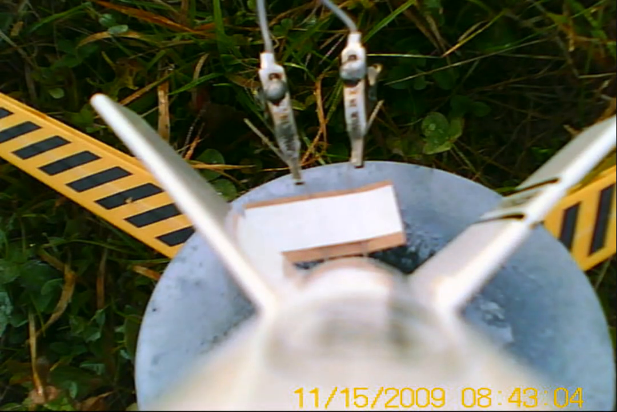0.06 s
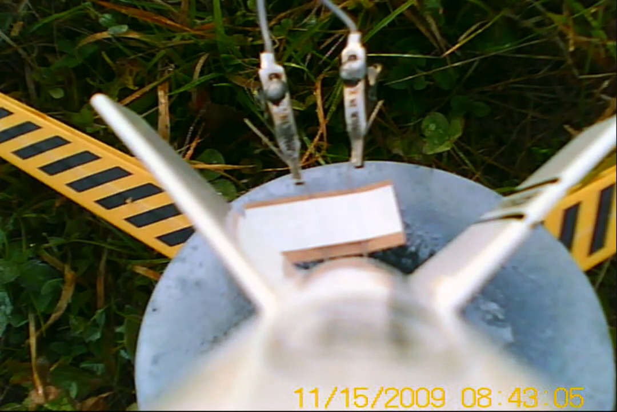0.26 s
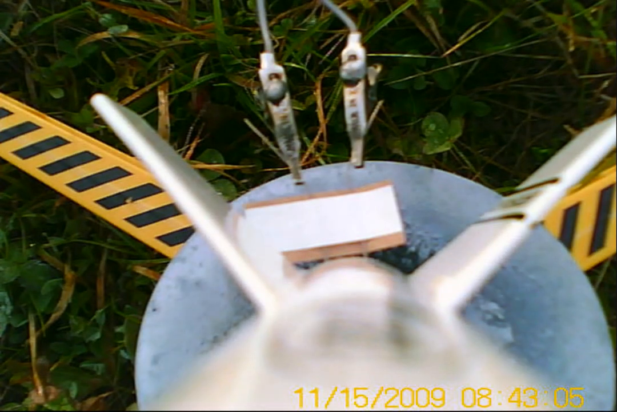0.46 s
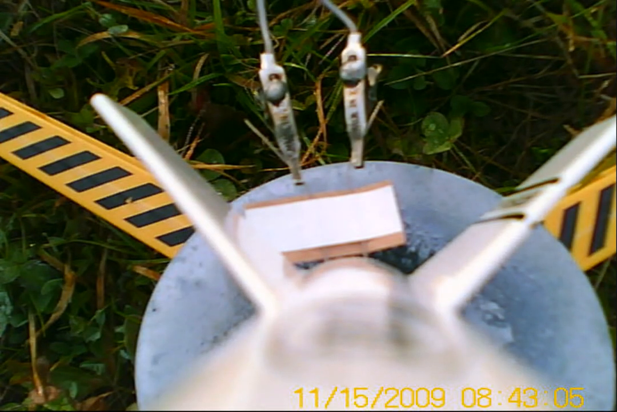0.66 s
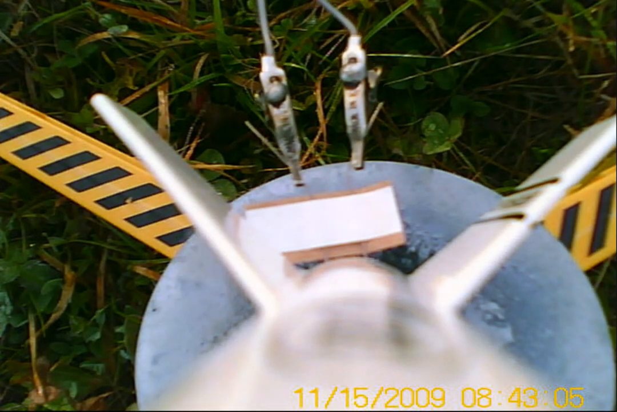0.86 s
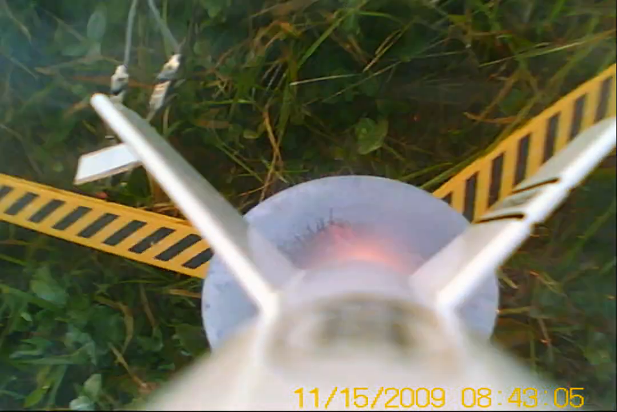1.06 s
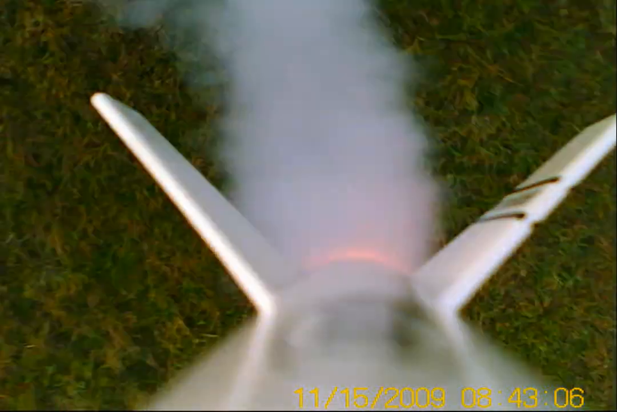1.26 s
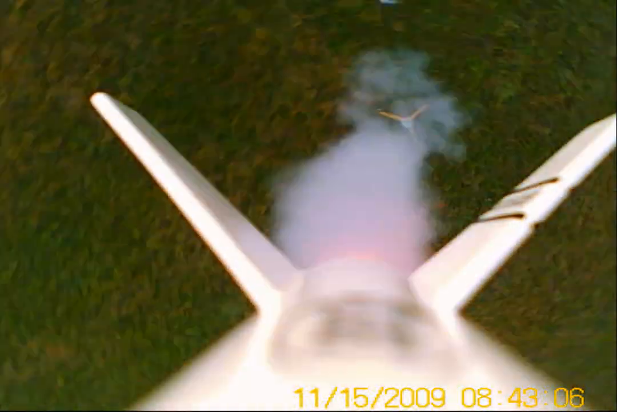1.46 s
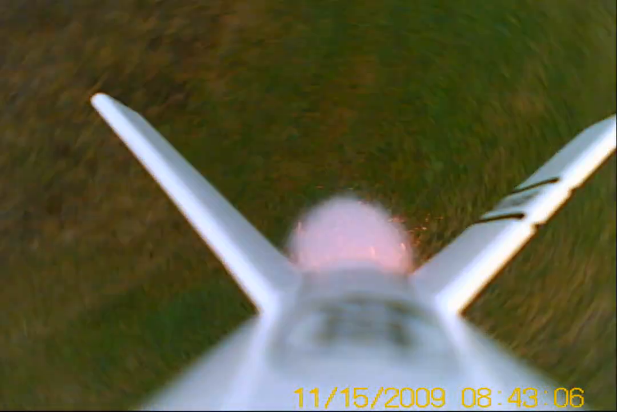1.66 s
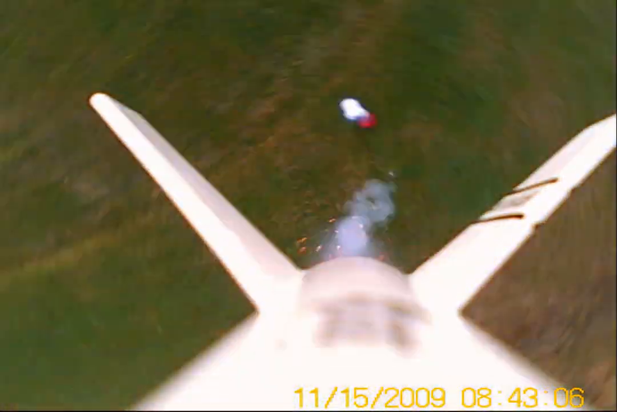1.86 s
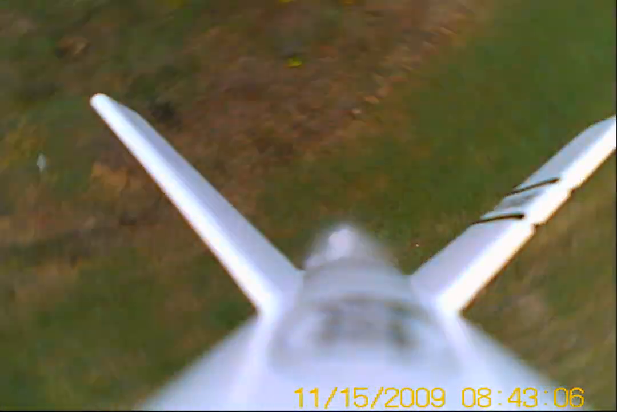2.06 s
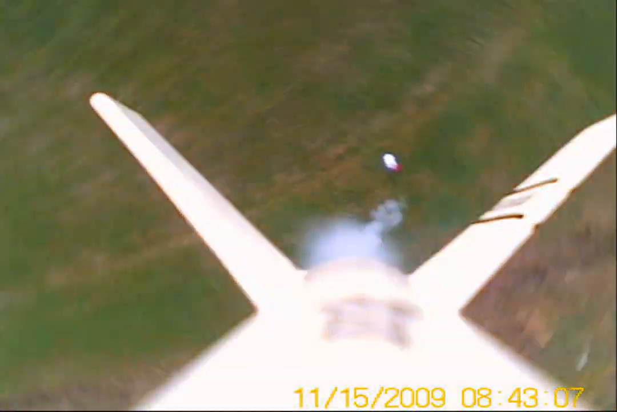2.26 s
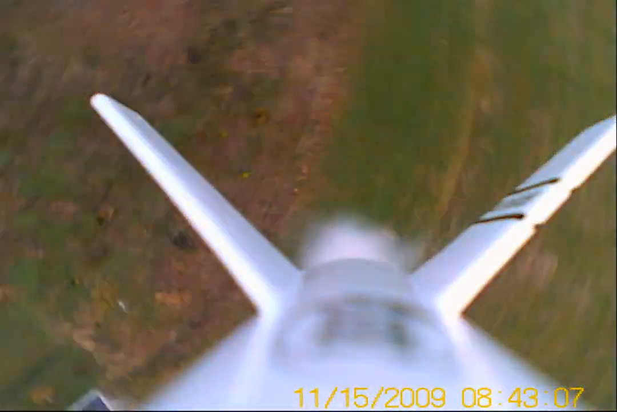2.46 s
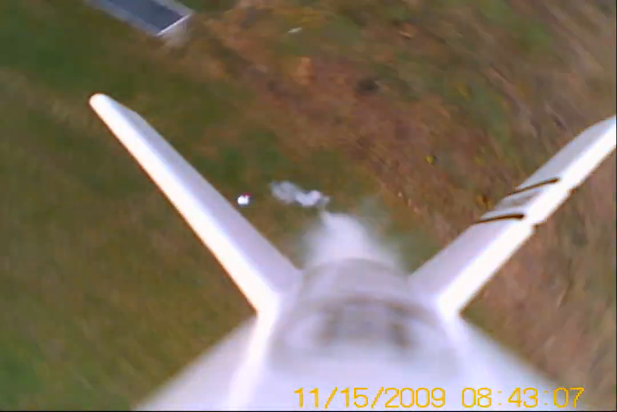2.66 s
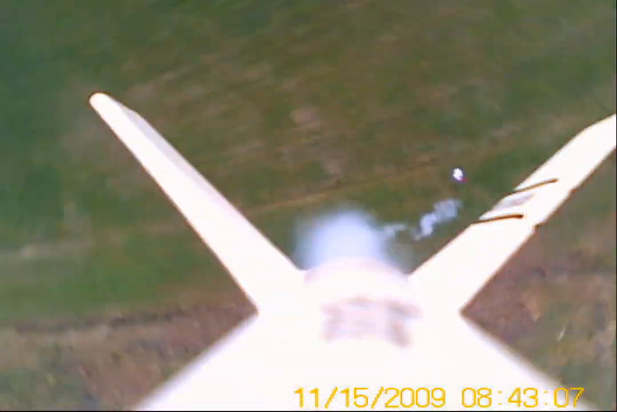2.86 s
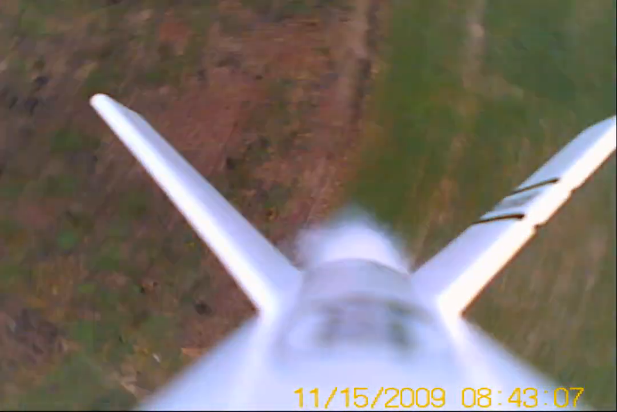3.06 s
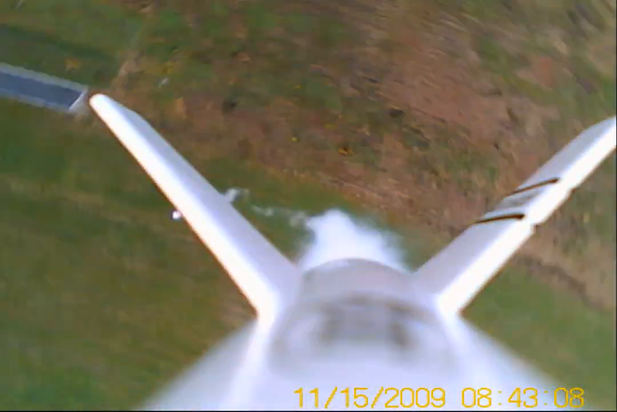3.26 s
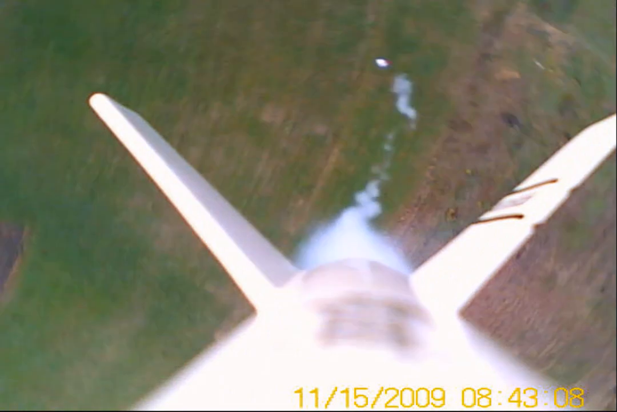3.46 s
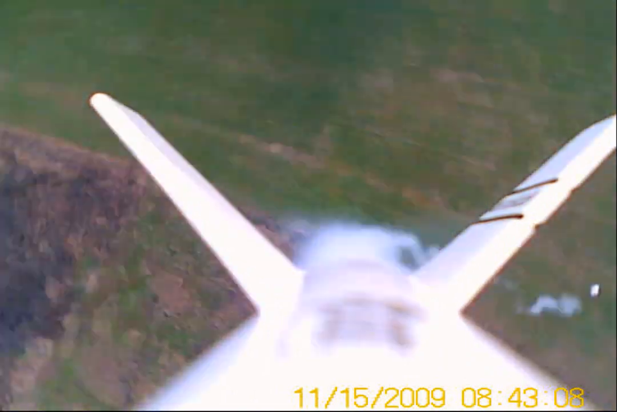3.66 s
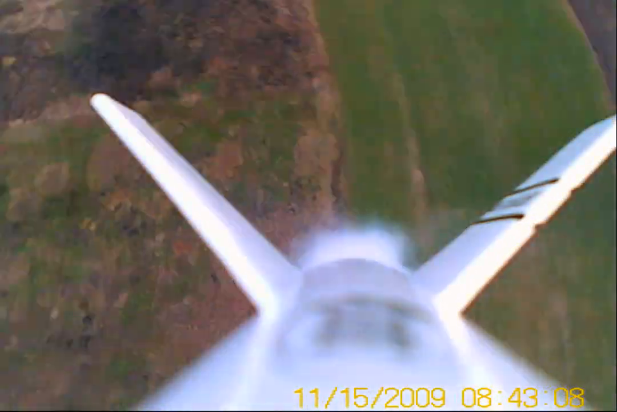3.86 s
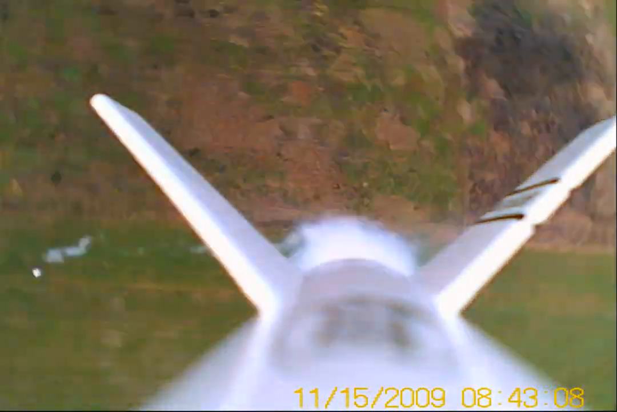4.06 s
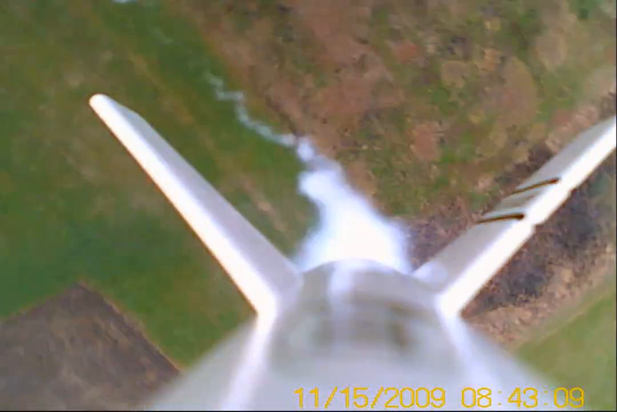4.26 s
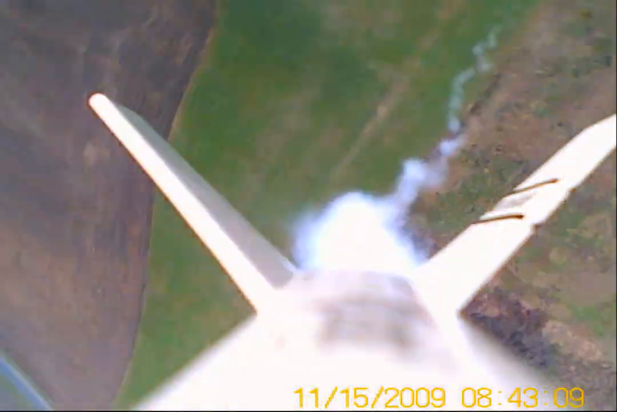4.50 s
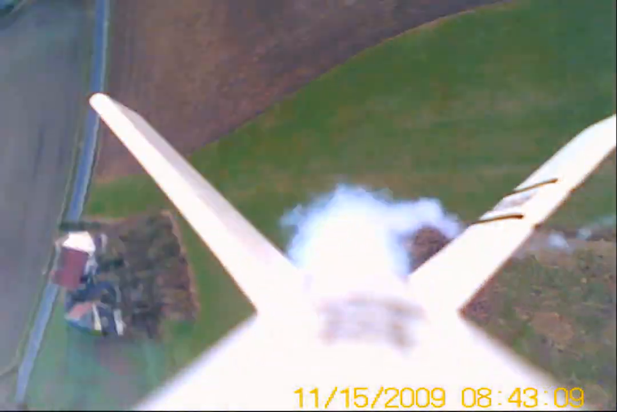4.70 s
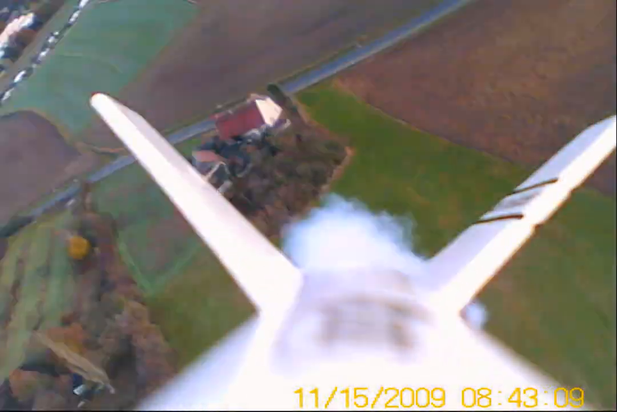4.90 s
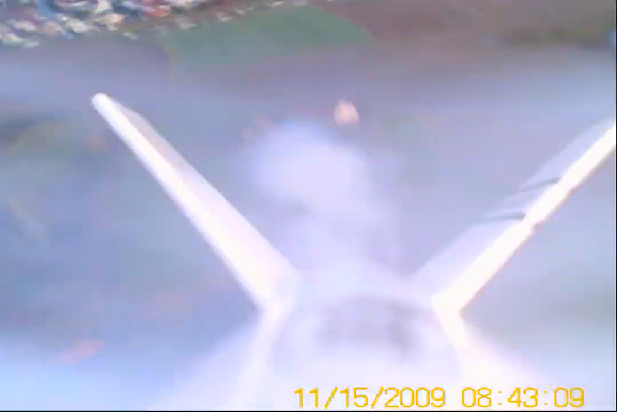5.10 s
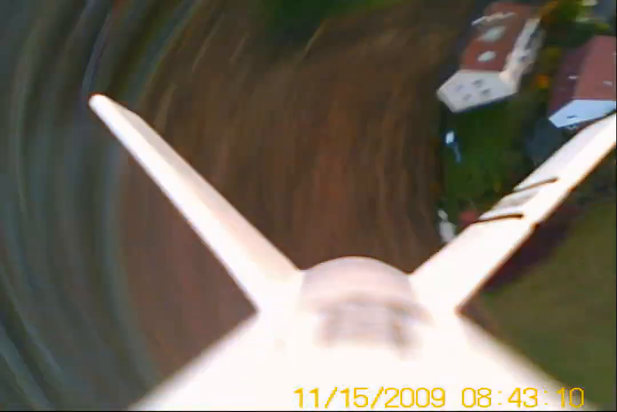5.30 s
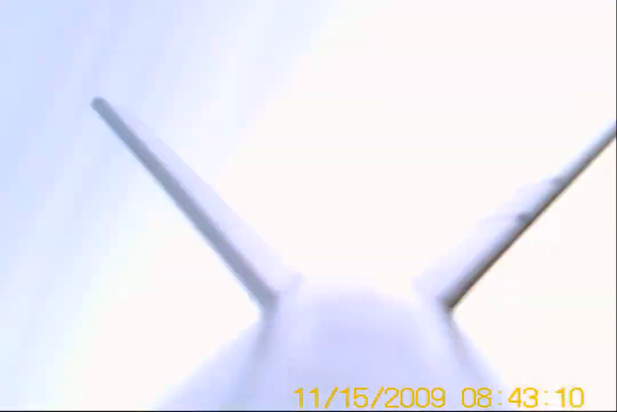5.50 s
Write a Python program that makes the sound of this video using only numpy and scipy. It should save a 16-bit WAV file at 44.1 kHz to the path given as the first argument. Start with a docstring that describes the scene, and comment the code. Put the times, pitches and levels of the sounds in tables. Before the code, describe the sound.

A small onboard microphone hears a model rocket launch outdoors. A brief crackling fizz leads into a sudden bright blast that surges unevenly, then gives way to a long rush of air that slowly fades. Near the end the ejection charge pops with a short hollow knock from the tube, the parachute flaps open and wind slaps the microphone, overloading it on the peaks.

```python
"""A model rocket motor blasts against the pad's deflector plate and lifts off, heard from the rocket's body.
Before it, the igniter fizzes over the low rumble of a field. In flight, eddies and hiss follow the
airspeed, growing dull and quiet as the rocket coasts. The ejection charge pops, the tube rings, the
parachute flaps out and the body tumbles in the wind. Peaks overload the small onboard camera's input."""
import sys
import numpy as np
from scipy import signal
from scipy.fft import rfft, irfft, next_fast_len
from scipy.io import wavfile
from scipy.ndimage import uniform_filter1d

SR = 44100
rng = np.random.default_rng(int(sys.argv[2]) if len(sys.argv) > 2 else 0)


def inscribe(sig):
    """Save sig as 16-bit PCM at rate SR to the path in sys.argv[1].

    A 1-D sig is mono; a 2-D sig holds one channel per row.
    Samples are clipped to [-1, 1] before scaling.
    """
    pcm = np.round(np.clip(np.atleast_2d(sig).T, -1, 1) * 32767)
    wavfile.write(sys.argv[1], SR, pcm.astype(np.int16))


N = 244314
TIME = np.arange(N) / SR
IGNITION_S, LIFTOFF_S, TOP_SPEED_S, BURNOUT_S, TUMBLE_S = 0.95, 1.16, 1.656, 2.06, 5.11
TOP_SPEED_M_S = 58.7


def gain_of(db):
    """Decibels to amplitude."""
    return 10 ** (np.asarray(db) / 20)


def unit_rms(x):
    """Scales to rms 1."""
    return x / np.sqrt(np.mean(x ** 2) + 1e-20)


def power_sum(gains):
    """Joint gain of unrelated noises: powers add."""
    return np.sqrt(sum(gain ** 2 for gain in gains))


def held(start_s, end_s, attack_s, release_s):
    """Gain that rises exponentially to 1 at start_s, holds until end_s, then decays."""
    return np.exp(-np.maximum(start_s - TIME, 0) / attack_s - np.maximum(TIME - end_s, 0) / release_s)


def swell(at_s, half_s, t=TIME):
    """Bell-shaped gain around at_s."""
    return np.exp(-0.5 * ((t - at_s) / half_s) ** 2)


def spectrum_db(points, hz):
    """Spectrum interpolated in log frequency; -12 dB/octave beyond its ends."""
    f, db = np.transpose(points)
    octaves_beyond = np.maximum(np.log2(f[0] / (hz + 1)), 0) + np.maximum(np.log2((hz + 1) / f[-1]), 0)
    return np.interp(np.log(hz + 1), np.log(f), db) - 12 * octaves_beyond


def bass_shelf(hz, corner_hz):
    """Weight: 1 in the bass, 0 in the treble."""
    return 1 / (1 + (hz / corner_hz) ** 2)


def coloured(x, points):
    """Filters x by a static spectrum; rms 1."""
    size = next_fast_len(N)
    response = gain_of(spectrum_db(points, np.fft.rfftfreq(size, 1 / SR)))
    return unit_rms(irfft(rfft(x, size) * response, size)[:N])


def lowpassed(x, hz):
    """Two-pole low-pass; rms 1."""
    return unit_rms(signal.sosfilt(signal.butter(2, hz, fs=SR, output="sos"), x))


def flutter(rate_hz, depth_db):
    """Random gain of unit power, wavering up to rate_hz."""
    return unit_rms(gain_of(depth_db * lowpassed(rng.standard_normal(N), rate_hz)))


def moving_noise(shape_db, patchy_db, size):
    """Steady-power noise whose spectrum follows shape_db(t, hz), with drifting patches."""
    hop = size // 4
    t, hz = np.arange(N // hop + 5)[:, None] * hop / SR, np.fft.rfftfreq(size, 1 / SR)
    real, imag, patches = rng.standard_normal((3, len(t), len(hz)))
    patches = unit_rms(uniform_filter1d(uniform_filter1d(patches, size=6, axis=0), size=7, axis=1))
    shape = gain_of(shape_db(t, hz))
    shape /= np.linalg.norm(shape, axis=-1, keepdims=True)
    frames = (real + 1j * imag) * gain_of(patchy_db * patches) * shape
    return unit_rms(signal.istft(frames.T, nperseg=size, noverlap=size - hop)[1][:N])


def burst(centre_hz, octaves, hold_s, decay_s):
    """Noise, briefly held then decaying, through one broad resonance."""
    t = np.arange(4096) / SR
    edges_hz = np.clip(centre_hz * 2 ** (np.array([-1, 1]) * octaves / 2), 20, SR / 2 - 1)
    band = signal.butter(2, edges_hz, "bandpass", fs=SR, output="sos")
    noise = rng.standard_normal(len(t)) * np.exp(-np.maximum(t - hold_s, 0) / decay_s)
    return unit_rms(signal.sosfilt(band, noise)) * noise.std()


def add(mix, at_s, sound):
    """Mixes a sound in at at_s."""
    part = mix[round(at_s * SR):][:len(sound)]
    part += sound[:len(part)]


# field rumble: f/Hz, relative level/dB
FIELD_SPECTRUM = [(20, 1), (40, -4), (75, -6.5), (110, -12), (170, -16.5), (280, -24), (450, -30.5),
                  (800, -32.5), (1100, -30), (1800, -36), (3200, -40.5), (6000, -44), (10000, -47)]
# hum and whines: f/Hz, rms level/dB
HUM_PARTIALS = [(32, -40), (56.4, -37.5), (360.7, -73.5), (2697, -77), (5599, -79)]
# wavering tone: t/s, f/Hz, rms level/dB
TONE_TRACK = [(0.1, 1020, -76), (0.21, 1010, -65), (0.31, 1058, -59), (0.42, 1030, -64), (0.53, 1006, -62),
              (0.62, 988, -76)]


def field():
    """Steady rumble and hum; a faint tone wavers before launch."""
    hum = sum(gain_of(db) * np.sin(2 * np.pi * (hz * TIME + rng.random())) for hz, db in HUM_PARTIALS)
    track_s, track_hz, track_db = np.transpose(TONE_TRACK)
    pitch_hz = np.interp(TIME, track_s, track_hz) * flutter(rate_hz=40, depth_db=0.07)
    gate = held(track_s[0], track_s[-1], attack_s=0.008, release_s=0.008)
    tone = gate * gain_of(np.interp(TIME, track_s, track_db)) * np.sin(2 * np.pi * np.cumsum(pitch_hz) / SR)
    rumble = gain_of(-40) * coloured(rng.standard_normal(N), FIELD_SPECTRUM)
    return rumble + np.sqrt(2) * (hum + tone)


# nozzle fizz: f/Hz, relative level/dB
FIZZ_SPECTRUM = [(300, -25), (800, -11.5), (2400, -15), (3000, -18), (4000, -7), (4700, 2), (5300, 0),
                 (6000, -6.5), (6600, -30), (6900, -23), (7400, -8), (8400, -5.5), (9500, -12),
                 (11000, -20)]
# flare-up steps: t/s, level/dB
IGNITER_FLARES = [(0.82, -37.5), (0.903, -30)]
# large sparks: t/s, level/dB, centre f/Hz
LARGE_SPARKS = [(0.825, -40, 6000), (0.857, -27.5, 3500), (0.902, -25, 4900)]


def igniter():
    """Propellant catches: gas and tiny sparks ring the narrow nozzle; a few large sparks snap."""
    sparks_per_s, spark_db = 250, 16
    sparks = (rng.random(N) < sparks_per_s / SR) * rng.standard_normal(N) * gain_of(spark_db)
    gas = rng.standard_normal(N) * flutter(rate_hz=410, depth_db=1.0)
    burning = power_sum(gain_of(db) * held(at_s, IGNITION_S, attack_s=0.0052, release_s=0.008)
                        for at_s, db in IGNITER_FLARES)
    out = burning * coloured(gas + sparks, FIZZ_SPECTRUM)
    for at_s, db, hz in LARGE_SPARKS:
        add(out, at_s, gain_of(db) * burst(hz, octaves=2.7, hold_s=0.00026, decay_s=0.00067))
    return out


# cord and fittings: t/s, level/dB, centre f/Hz
FITTING_TICKS = [(5.108, -22, 2000), (5.231, -27, 5000), (5.254, -24, 2000), (5.299, -33, 4360),
                 (5.491, -46, 7500)]
# cloth: t/s, level/dB, decay/s
CLOTH_FLAPS = [(5.11, -28, .002), (5.2165, -21.5, 0.0062), (5.405, -24, 0.0028), (5.446, -30, .018)]


def parachute():
    """Fittings tick against the body; the cloth shifts and flaps open."""
    out = np.zeros(N)
    for at_s, db, hz in FITTING_TICKS:
        add(out, at_s, gain_of(db) * burst(hz, octaves=1.8, hold_s=0.0008, decay_s=0.0012))
    for at_s, db, decay_s in CLOTH_FLAPS:
        add(out, at_s, gain_of(db) * burst(centre_hz=565, octaves=1.4, hold_s=0.0041, decay_s=decay_s))
    return out


# crosswind: f/Hz, relative level/dB
WIND_SPECTRUM = [(20, 1), (45, 0), (100, -3.5), (200, -12.5), (400, -15.5), (900, -24.5), (1800, -32.5),
                 (3500, -50), (6000, -66), (10000, -85)]
# wind between lulls: start/s, end/s, level/dB
WIND_SPANS = [(5.11, 5.202, -22), (5.214, 5.422, -21), (5.446, 5.542, -22.5)]
# gusts on the microphone: t/s, half width/s, rumble/dB, slap/dB
MIC_GUSTS = [(5.1602, 0.005, -22.5, -5), (5.228, 0.014, -12.5, -6), (5.249, 0.013, -15.5, -9),
             (5.316, 0.02, -22, -9), (5.4088, 0.018, -14, -4)]


def tumble():
    """Wind on the tumbling body; each gust is a swell of rumble with a pressure slap at its peak."""
    slap_s = 0.0016
    wind = coloured(rng.standard_normal(N) * flutter(rate_hz=100, depth_db=2), WIND_SPECTRUM)
    rumble = lowpassed(coloured(rng.standard_normal(N), WIND_SPECTRUM), hz=160)
    out = wind * power_sum(gain_of(db) * held(start_s, end_s, attack_s=0.0046, release_s=0.0074)
                           for start_s, end_s, db in WIND_SPANS)
    for at_s, half_s, rumble_db, slap_db in MIC_GUSTS:
        out += gain_of(rumble_db) * swell(at_s, half_s) * rumble
        out -= gain_of(slap_db) / (1 + ((TIME - at_s) / slap_s) ** 2) ** 1.5
    return out


# tube modes: f/Hz, relative level/dB, t60/s
TUBE_MODES = [(844, -8.5, 0.026), (1990, 1, 0.013), (2320, -12, 0.011), (3330, -6, 0.011)]
# blows on the tube: t/s, level/dB
TUBE_BLOWS = [(5.1407, -3), (5.1445, -12)]


def tube():
    """The light body tube rings briefly under each blow as the nose cone leaves."""
    attack_s = 0.00018
    out, t = np.zeros(N), np.arange(2048) / SR
    ring = sum(gain_of(db - 60 * t / t60_s) * np.sin(2 * np.pi * hz * t) for hz, db, t60_s in TUBE_MODES)
    for at_s, db in TUBE_BLOWS:
        add(out, at_s, gain_of(db) * ring * (1 - np.exp(-t / attack_s)))
    return out


# ejection hiss: f/Hz, relative level/dB
EJECTION_HISS_SPECTRUM = [(300, 9.5), (1200, -11), (3500, -4), (5500, -12), (8500, -8.5), (10500, -18)]
# hiss spells (gas vents before the pop; later the parachute rustles): start/s, end/s, level/dB
HISS_SPELLS = [(5.107, 5.137, -23.5), (5.16, 5.2, -47), (5.227, 5.26, -39.5)]


def ejection():
    """Gas hisses, the charge pops (low thump, hollow bang, bright crack), then the parachute rustles."""
    pop_s = 5.1275
    hissing = power_sum(gain_of(db) * held(start_s, end_s, attack_s=0.0089, release_s=0.017)
                        for start_s, end_s, db in HISS_SPELLS)
    noise = rng.standard_normal(N) * flutter(rate_hz=640, depth_db=3.5)
    out = hissing * coloured(noise, EJECTION_HISS_SPECTRUM)
    thump = gain_of(-7) * burst(centre_hz=300, octaves=1.6, hold_s=0.002, decay_s=0.0009)
    bang = gain_of(1) * burst(centre_hz=1400, octaves=1.3, hold_s=0.0012, decay_s=0.00057)
    crack = gain_of(-5) * burst(centre_hz=6300, octaves=1.34, hold_s=0.0014, decay_s=0.00041)
    add(out, pop_s, thump + bang + crack)
    return out


def airspeed_m_s(t):
    """Linear rise under thrust, then exponential decay under drag."""
    pad_m_s, coast_s = 4, 2.664
    climb = np.clip((t - LIFTOFF_S) / (TOP_SPEED_S - LIFTOFF_S), 0, 1)
    slowing = np.exp(-np.maximum(t - TOP_SPEED_S, 0) / coast_s)
    return (pad_m_s + (TOP_SPEED_M_S - pad_m_s) * climb) * slowing


def airspeed_gain(db_per_decade):
    """Air noise grows as a power of airspeed; gated from lift-off to tumble."""
    flying = held(LIFTOFF_S, TUMBLE_S, attack_s=0.02, release_s=0.03)
    return flying * gain_of(db_per_decade * np.log10(airspeed_m_s(TIME) / TOP_SPEED_M_S))


# hiss at high and low airspeed: f/Hz, relative level/dB
FAST_HISS_SPECTRUM = [(300, -7), (1500, 6.5), (2800, 1.5), (3900, 1), (5000, -0.5), (6200, -2.5),
                      (8000, -3), (9200, -4.5), (10500, -21)]
SLOW_HISS_SPECTRUM = [(300, 8), (1500, -0.5), (2200, -2), (2750, -4.5), (3150, 0.5), (3400, -3),
                      (3850, 0.5), (4600, -5), (5300, -10), (6500, -10.5), (8000, -9.5), (9200, -13),
                      (10500, -27)]


def body_hiss():
    """Air hisses along the tube; the camera housing's resonances stand out as the rocket slows."""
    def shape_db(t, hz):
        slow_m_s, span_m_s = 36, 24
        fast = np.clip((airspeed_m_s(t) - slow_m_s) / span_m_s, 0, 1)
        return fast * spectrum_db(FAST_HISS_SPECTRUM, hz) + (1 - fast) * spectrum_db(SLOW_HISS_SPECTRUM, hz)
    hiss = moving_noise(shape_db, patchy_db=0.33, size=512) * flutter(rate_hz=310, depth_db=0.76)
    return gain_of(-23.5) * airspeed_gain(db_per_decade=32.5) * hiss


# turbulence at the reference airspeed: f/Hz, relative level/dB
EDDY_SPECTRUM = [(20, 2), (60, 2.5), (170, 0.5), (300, -4), (600, -8), (1000, -13.5), (1400, -13),
                 (2000, -23.5), (3000, -29), (8000, -35)]
# rough air: t/s, half width/s, boost/dB, bass tilt/dB
ROUGH_PATCHES = [(1.375, 0.038, 6.5, 9.5), (1.81, 0.051, 2.5, 1.5)]


def turbulence():
    """Eddies pass the microphone, their spectrum sliding with airspeed; rough air swells them."""
    reference_m_s, build_s = 44.5, 0.17

    def shape_db(t, hz):
        eddy_db = spectrum_db(EDDY_SPECTRUM, hz * reference_m_s / airspeed_m_s(t))
        mic_port_loss_db = 4 * bass_shelf(hz, corner_hz=90)
        tilt_db = sum(db * swell(at_s, half_s, t) for at_s, half_s, _, db in ROUGH_PATCHES)
        return eddy_db - mic_port_loss_db + tilt_db * bass_shelf(hz, corner_hz=150)
    eddies = moving_noise(shape_db, patchy_db=0.35, size=2048) * flutter(rate_hz=94, depth_db=1.24)
    rough_db = sum(db * swell(at_s, half_s) for at_s, half_s, db, _ in ROUGH_PATCHES)
    building = np.clip((TIME - LIFTOFF_S) / build_s, 0, 1)
    return gain_of(-14 + rough_db) * building * airspeed_gain(db_per_decade=30) * eddies


# motor surges: t/s, half width/s, jet/dB, plate roar/dB, backwash/dB
MOTOR_SURGES = [(0.968, 0.0088, -9.5, -35, -19), (1.001, .014, -18.5, -11, -38.5),
                (1.045, 0.0059, -3, -19, -19), (1.086, 0.011, -6, -21, -28),
                (1.121, 0.0097, -13, -29, -28.5), (1.164, .012, -19, -15.5, -26)]


def surge_gain(layer):
    """Gain of one motor layer as the motor sputters on the pad."""
    column = ("jet", "plate", "backwash").index(layer)
    return power_sum(gain_of(db[column]) * swell(at_s, half_s) for at_s, half_s, *db in MOTOR_SURGES)


# exhaust rumble: f/Hz, relative level/dB
BACKWASH_SPECTRUM = [(20, 6), (60, 4.5), (160, 6.5), (260, -18), (600, -28)]


def backwash():
    """Exhaust thrown back by the pad rumbles with each surge."""
    return surge_gain("backwash") * coloured(rng.standard_normal(N), BACKWASH_SPECTRUM)


def plate_roar():
    """The jet's hollow roar off the deflector plate sinks and fades as the nozzle leaves."""
    def shape_db(t, hz):
        near_hz, far_hz, width_hz, sink_s = 2460, 1250, 800, 0.025
        centre_hz = far_hz + (near_hz - far_hz) * np.exp(-np.maximum(t - LIFTOFF_S, 0) / sink_s)
        return -14 * np.log10(1 + ((hz - centre_hz) / width_hz) ** 2)
    leaving = gain_of(-19.5) * held(LIFTOFF_S, LIFTOFF_S, attack_s=0.0102, release_s=0.31)
    return power_sum([leaving, surge_gain("plate")]) * moving_noise(shape_db, patchy_db=-1.0, size=512)


# exhaust jet: f/Hz, relative level/dB
JET_SPECTRUM = [(35, -40), (60, -11.5), (173, -3), (250, -7.5), (324, -2.5), (448, -8), (838, -5),
                (913, -8), (2310, -3), (2750, 0), (3890, -4.5), (8100, 1.5), (10500, -5), (13600, -11),
                (22000, -120)]


def jet():
    """Bright jet, loudest while it strikes the pad; thinner and faint in free air."""
    def shape_db(t, hz):
        bass_loss_db = 9 * (t > LIFTOFF_S) * bass_shelf(hz, corner_hz=420)
        return spectrum_db(JET_SPECTRUM, hz) - bass_loss_db
    on_pad = gain_of(-10) * held(IGNITION_S, LIFTOFF_S, attack_s=0.0034, release_s=0.006)
    leaving = gain_of(-16) * held(IGNITION_S, LIFTOFF_S, attack_s=0.011, release_s=0.18)
    free_air = gain_of(-39) * held(IGNITION_S, BURNOUT_S, attack_s=0.013, release_s=0.08)
    gain = power_sum([on_pad, leaving, free_air, surge_gain("jet")])
    return gain * moving_noise(shape_db, patchy_db=1.9, size=512)


def motor():
    """Uneven burning shakes the jet and plate roar together, over the backwash."""
    return (jet() + plate_roar()) * flutter(rate_hz=78, depth_db=0.85) + backwash()


def scene():
    """One microphone, direct sound only: open air gives no echo."""
    ascent = field() + igniter() + motor() + turbulence() + body_hiss()
    return (ascent + ejection() + tube() + parachute() + tumble())[None]


def record(dry):
    """The input overloads, the camera narrows the band; overshoots clip and are low-passed again."""
    ceiling, band_hz, edge_hz = 1.1, 10750, 16000
    band_fir = signal.firwin(161, band_hz, window=("kaiser", 8), fs=SR)[None]
    edge_fir = signal.firwin(511, edge_hz, window=("kaiser", 9), fs=SR)[None]
    narrow = signal.oaconvolve(np.clip(dry, -ceiling, ceiling), band_fir, "same")
    return signal.oaconvolve(np.clip(narrow, -1, 1), edge_fir, "same")


dry = scene()
out = record(dry)
inscribe(out)
```